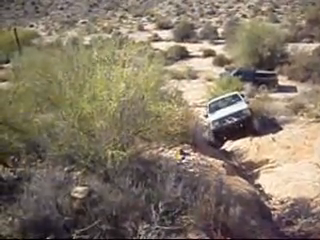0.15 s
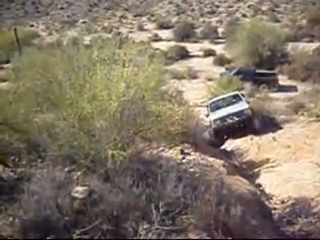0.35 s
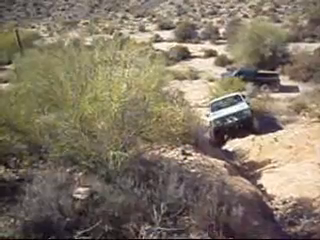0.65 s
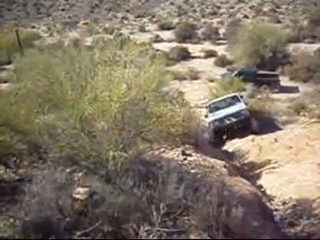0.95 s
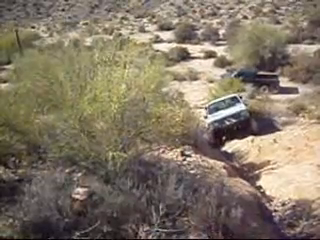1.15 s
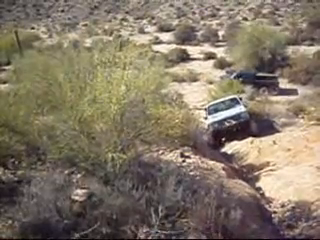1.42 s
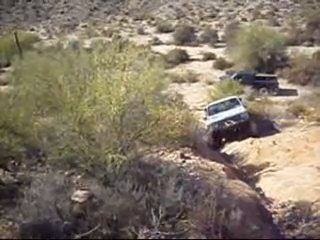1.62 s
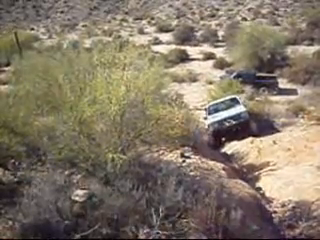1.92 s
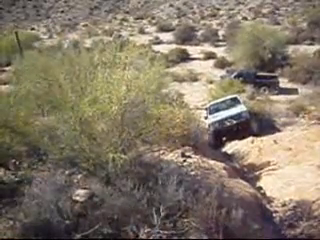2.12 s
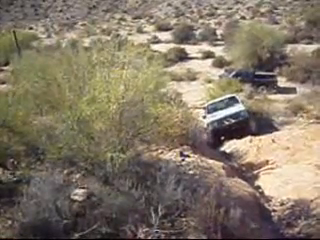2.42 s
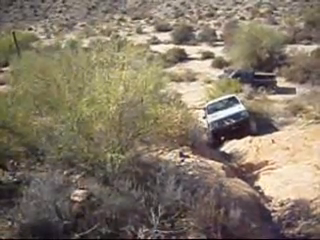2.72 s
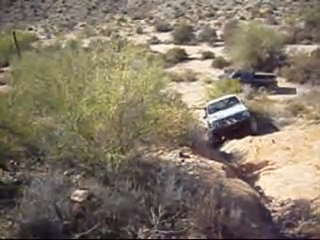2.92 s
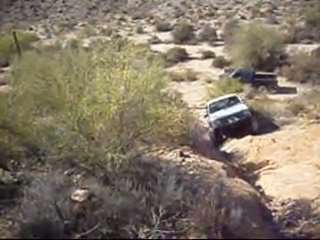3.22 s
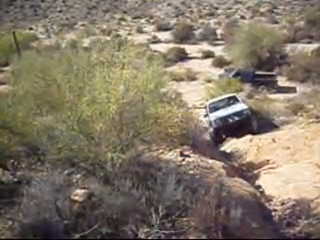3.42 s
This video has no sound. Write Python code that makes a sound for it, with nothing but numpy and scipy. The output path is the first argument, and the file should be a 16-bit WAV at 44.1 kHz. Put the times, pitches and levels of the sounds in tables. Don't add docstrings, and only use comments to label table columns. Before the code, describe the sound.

Truck engine growls unevenly uphill, with sliding grit, stone knocks, wind buffeting and camera motor whine.

```python
import sys
import numpy as np
from scipy import signal
from scipy.fft import rfft, irfft
from scipy.io import wavfile
from scipy.ndimage import uniform_filter1d, map_coordinates

SR = 44100
rng = np.random.default_rng(int(sys.argv[2]) if len(sys.argv) > 2 else 0)


def natural_amplitude(level_db):
    exponent = np.asarray(level_db, float) / 20
    return 10 ** exponent


def digitize_waveform(pressure):
    field = np.atleast_2d(pressure).T
    bounded = np.clip(field, -1, 1)
    quanta = np.round(bounded * 32767).astype(np.int16)
    wavfile.write(sys.argv[1], SR, quanta)


N = 156555


def evened(x):
    return x / np.sqrt(np.mean(x ** 2) + 1e-20)


def curve(table, col):
    rows = np.array(table)
    return np.interp(np.arange(N) / SR, rows[:, 0], rows[:, col])


def drift(top_hz):
    spectrum = rfft(rng.standard_normal(N))
    spectrum[0] = 0
    hz = np.fft.rfftfreq(N, 1 / SR)
    return evened(irfft(spectrum / (1 + (hz / top_hz) ** 4), N))


def noise(points, patch_db, size=2048):
    frames = 4 * N // size + 6
    hz = np.fft.rfftfreq(size, 1 / SR)
    real, imag, patches = rng.standard_normal((frames, len(hz), 3)).T
    patches = uniform_filter1d(patches, size=9, axis=0)
    patches = evened(uniform_filter1d(patches, size=6, axis=1))
    f, db = np.transpose(points)
    colour_db = np.interp(np.log(hz + .1), np.log(f), db)[:, None]
    spectra = (real + 1j * imag) * natural_amplitude(colour_db + patch_db * patches)
    return evened(signal.istft(spectra, nperseg=size, noverlap=3 * size // 4)[1][:N])


def resonate(x, hz, width):
    turn = np.exp(2j * np.pi * hz * np.arange(len(x)) / SR)
    decay = np.exp(-np.pi * width / SR)
    return 2 * (turn * signal.lfilter([1 - decay], [1, -decay], x / turn)).real


# t/s, f/Hz
FIRING_RATE = [(0, 96), (.4, 94), (.85, 101), (1.15, 95.5), (1.5, 95.5), (1.7, 102), (1.85, 112),
               (2.0, 115.5), (2.2, 116), (2.45, 109), (2.68, 100), (2.85, 97.5), (3.0, 103), (3.18, 114),
               (3.35, 117), (3.55, 115)]
# t/s, level/dB
ENGINE_LOAD = [(0, -30), (.6, -42), (1.0, -35), (1.5, -35), (1.75, -35.5), (1.95, -33), (2.25, -27.5),
               (2.6, -34.5), (2.9, -33), (3.15, -32), (3.55, -34)]
SHAFT_ORDERS = [.5, 1, 1.5, 2, 2.5, 3, 4, 4.5, 5, 6]
SHAFT_LEVELS = [-3, 2, -5, -9, -11, 0, -8, -12, -9, -12]
# f/Hz, level/dB per Hz
ENGINE_ROAR = [(15, -10), (33, -2), (50, -7.5), (75, -9.5), (130, -11), (250, -12.5), (450, -25),
               (1200, -38)]


def engine():
    misfire_db, misfire_hz = 1.8, 5.0
    speed_wobble = 1 + .004 * drift(4)
    turns = np.cumsum(curve(FIRING_RATE, 1) * speed_wobble) / SR / 3
    exhaust = 0
    for order, db in zip(SHAFT_ORDERS, SHAFT_LEVELS):
        strength = natural_amplitude(db + misfire_db * drift(misfire_hz))
        exhaust = exhaust + strength * np.sin(2 * np.pi * (order * turns + rng.random()))
    roar = natural_amplitude(-28.5) * noise(ENGINE_ROAR, patch_db=1.5, size=4096)
    return np.sqrt(2) * natural_amplitude(curve(ENGINE_LOAD, 1)) * exhaust + roar


# t/s, level/dB, length/s, centre f/Hz, width/Hz
GRIT_SPURTS = [
    (.172, -44, .025, 2700, 3000),
    (.272, -44, .02, 2700, 3000),
    (2.398, -42, .003, 2500, 3000),
    (.922, -46, .01, 2700, 3000),
    (2.38, -38, .04, 330, 250),
    (.872, -31, .06, 430, 500),
    (.45, -31, .02, 450, 450),
    (3.298, -31, .025, 480, 500),
]


def grit():
    t = np.arange(N) / SR
    impacts = rng.standard_normal(N)
    hiss_t60, slide_end_s = 1.25, 0.36
    hiss = natural_amplitude(-42 - 60 * t / hiss_t60) * evened(resonate(impacts, 2680, width=1800.0))
    slide = natural_amplitude(-34.5) / (1 + (t / slide_end_s) ** 8)
    out = hiss + slide * evened(resonate(impacts, 229, width=160.0))
    for start, db, length, hz, width in GRIT_SPURTS:
        swell = np.exp(-(2 * (t - start) / length - 1) ** 2)
        rubbing = resonate(resonate(impacts, hz, width), hz, width)
        out = out + natural_amplitude(db) * swell * evened(rubbing)
    return out


# t/s, peak level/dB, f/Hz, t60/s
STONE_KNOCKS = [
    (.452, -25, 400, .08),
    (.454, -27, 560, .07),
    (.895, -30, 345, .14),
    (2.71, -45, 2200, .25),
    (3.30, -25, 570, .12),
    (3.302, -28, 310, .08),
    (.877, -19, 800, .025),
    (2.3955, -17, 860, .04),
    (3.2088, -7, 275, .034),
]


def knocks():
    t = np.arange(N) / SR
    contact_s = .0025
    out = np.zeros(N)
    for start, db, hz, t60 in STONE_KNOCKS:
        since = np.maximum(t - start, 0)
        rise = np.minimum(since / contact_s, 1)
        out = out - rise * natural_amplitude(db - 60 * since / t60) * np.sin(2 * np.pi * hz * since)
    return out


# t/s, gust level/dB
WIND_GUSTS = [(0.0, -39.5), (0.35, -36), (0.37, -40), (0.55, -22), (0.9, -40), (1.72, -12), (1.75, -22.5),
              (1.89, -13.5), (1.97, -13.5), (2.01, -25), (2.13, -9.5), (2.19, -8.5), (2.31, -25),
              (2.56, -18), (3.03, -28), (3.12, -15), (3.34, -18), (3.55, -25)]
# f/Hz, level/dB per Hz
WIND_COLOUR = [(1, -5), (4, 0), (8, 2), (18, -7.5), (40, -14), (90, -23), (200, -39.5), (400, -64.5)]


def wind():
    return natural_amplitude(curve(WIND_GUSTS, 1) + 2 * drift(6.4)) * noise(WIND_COLOUR, patch_db=-3.5, size=16384)


MOTOR_ORDERS = [1, 3, 4, 5, 6, 9, 12.84, 13.66]
MOTOR_LEVELS = [-38.5, -32.5, -43.5, -69, -76.5, -61.5, -62, -66]
# f/Hz, width/Hz, rms level/dB
CASE_MODES = [(722, 168, -32.5), (856.5, 79, -34.5), (966.4, 153, -35), (1494, 87, -57.5), (2116, 330, -50),
              (2937, 760, -51.5)]
# f/Hz, level/dB per Hz
HISS_COLOUR = [(300, -4), (1200, -9), (1800, -20), (2400, 5), (3200, 2), (4000, 1)]


def camera():
    turns = np.cumsum(245.9 + .35 * drift(3.03)) / SR
    tones = 0
    for order, db in zip(MOTOR_ORDERS, MOTOR_LEVELS):
        strength = natural_amplitude(db + 1.2 * drift(1.6))
        tones = tones + strength * np.sin(2 * np.pi * (order * turns + rng.random()))
    brush_swing = 1 + 0.2 * np.cos(2 * np.pi * turns)
    brushes = noise([(100, 0), (5000, 0)], patch_db=-1, size=1024) * brush_swing
    case = 0
    for k, (hz, width, db) in enumerate(CASE_MODES):
        mode = evened(resonate(resonate(brushes, hz, width), hz, width))
        case = case + (-1) ** k * natural_amplitude(db) * mode
    hiss = natural_amplitude(-43.5) * noise(HISS_COLOUR, patch_db=1.5, size=512)
    return np.sqrt(2) * tones + case + hiss


def scene():
    return (engine() + wind() + camera() + grit() + knocks())[None]


def low_pass(x):
    return signal.sosfilt(signal.butter(12, 13220, fs=SR, output="sos"), x)


def record(dry):
    power_db = 10 * np.log10(abs(uniform_filter1d(dry[0] ** 2, size=16000)) + 1e-12)
    excess_db = np.maximum(power_db + 35, 0)
    ducked = dry[0] / natural_amplitude(0.15 * excess_db)
    narrow = signal.oaconvolve(ducked, signal.firwin(201, 4100, fs=SR), "same")
    block, steps_per_block, hold_hz, first_block = 2820, 512, 8000.6, 1478
    n = np.arange(N) - first_block
    block_start = first_block + n // block * block
    step = np.floor(n % block * hold_hz / SR)
    held_at = block_start + (step + .5) * block / steps_per_block
    held = map_coordinates(narrow, [held_at], order=3, mode="nearest")
    edge = signal.firwin(1601, 12690, window=("kaiser", 8), fs=SR)
    mix = signal.oaconvolve(held, edge, "same")
    return low_pass(mix[None])


dry = scene()
out = record(dry)
digitize_waveform(out)
```